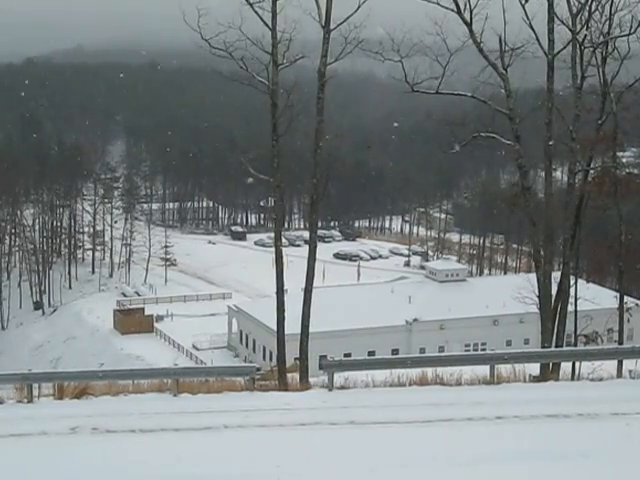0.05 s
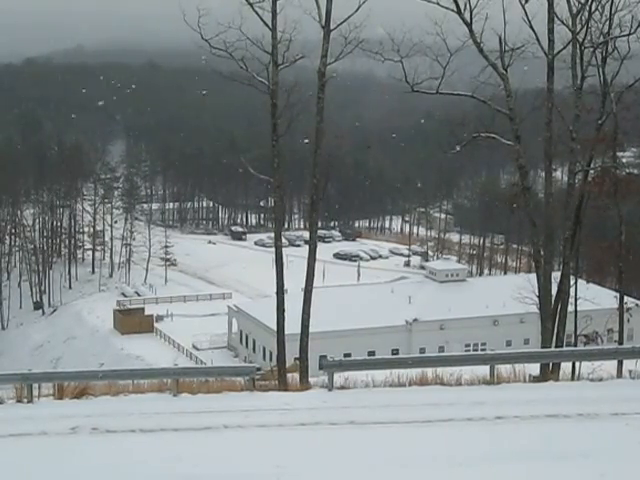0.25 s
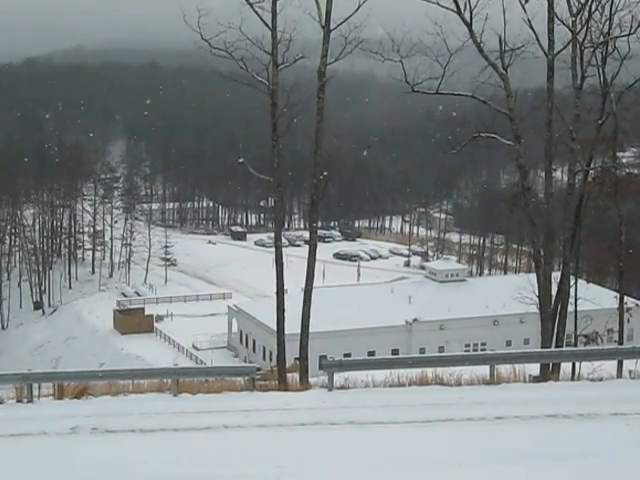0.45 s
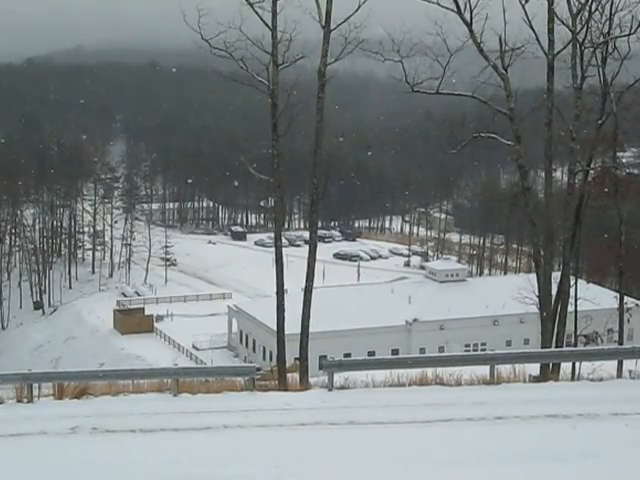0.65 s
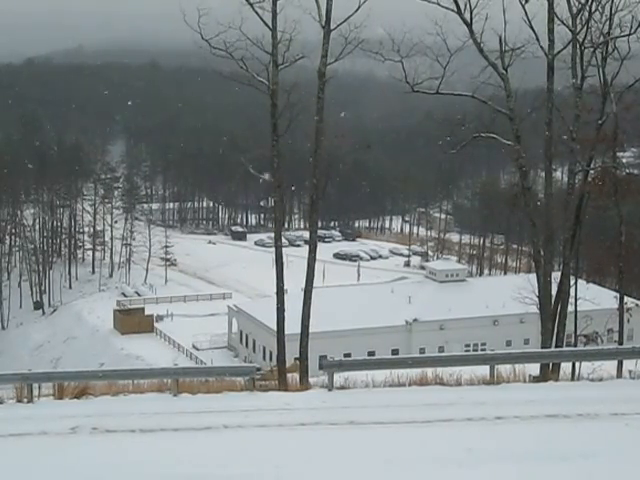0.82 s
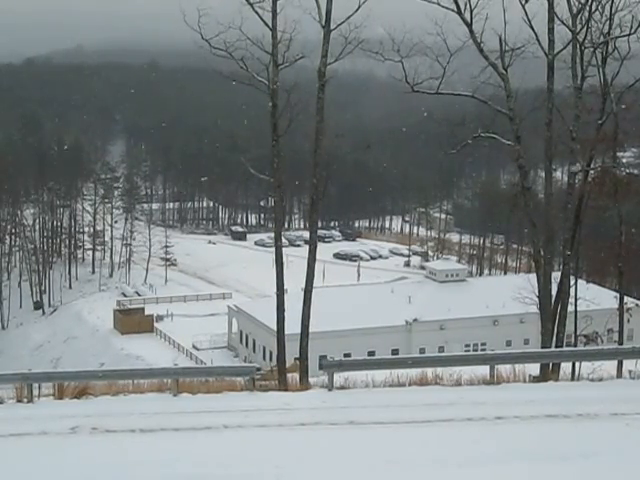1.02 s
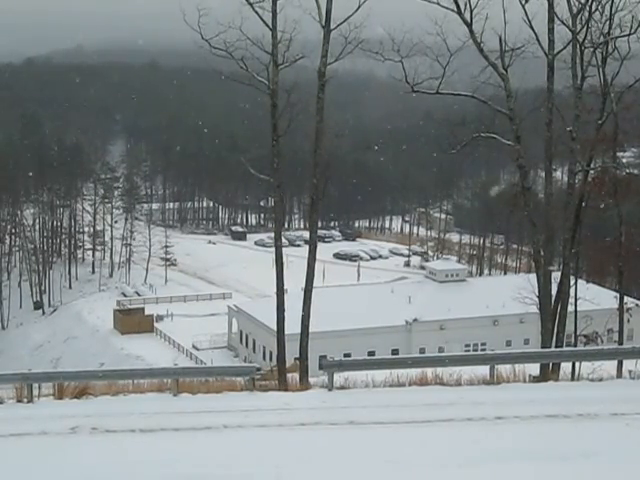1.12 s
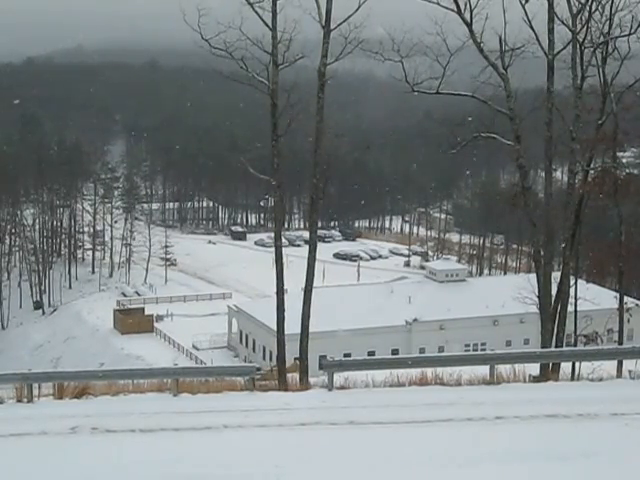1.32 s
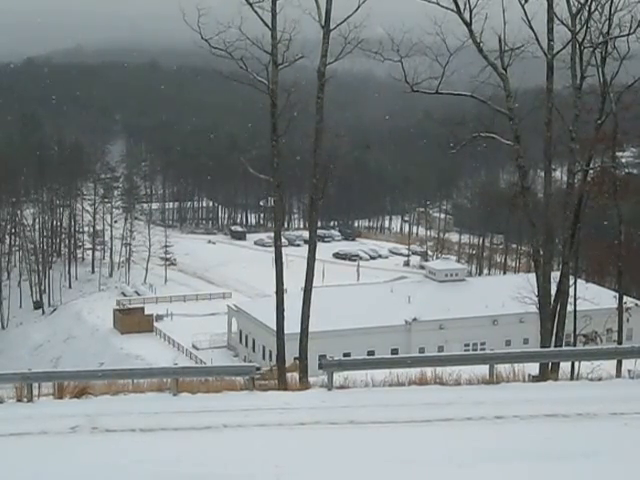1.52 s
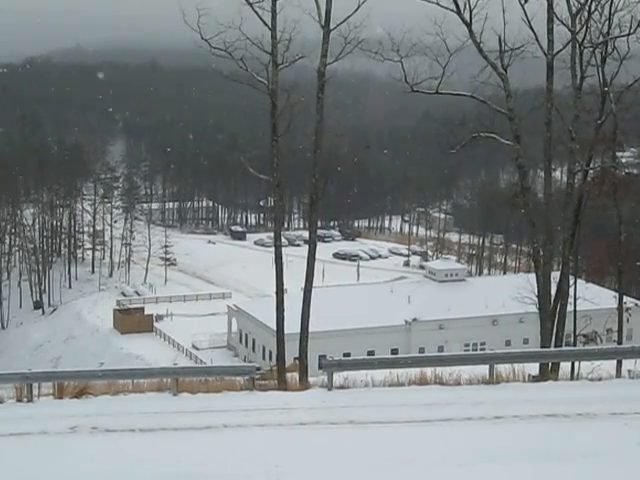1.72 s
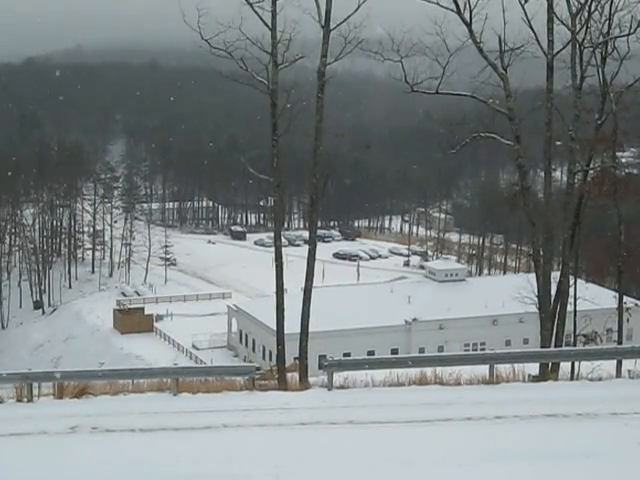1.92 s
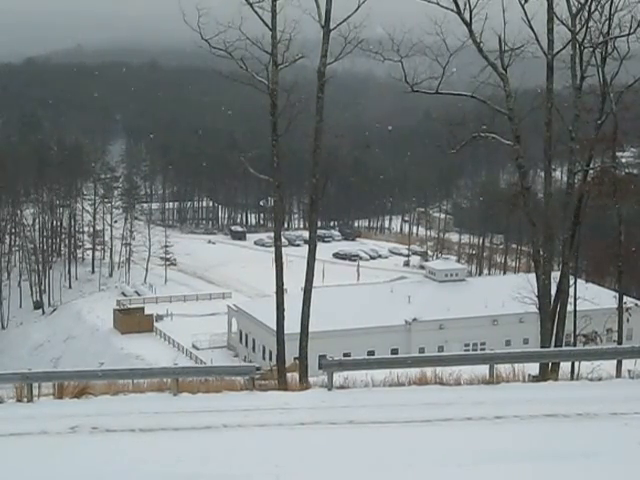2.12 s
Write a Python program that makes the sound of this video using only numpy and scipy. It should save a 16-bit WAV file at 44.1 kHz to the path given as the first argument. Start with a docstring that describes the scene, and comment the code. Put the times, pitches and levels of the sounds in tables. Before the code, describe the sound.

A small plastic button clicks twice close by, with soft finger brushing over quiet outdoor air.

```python
"""A still, snowy hillside on one microphone: a steady far-off rush and faint hiss throughout.
Close up, a small plastic control is pressed: it slides, scraping ever harder, and snaps home,
leaving a tiny spring ringing. A faint swish follows. About a second in, the control is let go
and scrapes and snaps again. Around that snap, and again after a pause, a finger brushes
softly over the casing."""
import sys
import numpy as np
from scipy import signal
from scipy.fft import rfft, irfft
from scipy.io import wavfile

SR = 44100
rng = np.random.default_rng(int(sys.argv[2]) if len(sys.argv) > 2 else 0)


def wav_record(signal):
    """Record a signal, one row per channel, as 16-bit PCM in the file named by sys.argv[1]."""
    frames = np.transpose(np.atleast_2d(signal))
    bounded = np.clip(frames, -1, 1)
    # unit amplitude maps onto the largest positive 16-bit level
    quanta = np.round(bounded * 32767).astype(np.int16)
    wavfile.write(sys.argv[1], SR, quanta)


N = 94815
TIME = np.arange(N) / SR
FREQS = np.fft.rfftfreq(N, 1 / SR)

# The far-off rush and hiss. Each row: frequency in Hz, level in dB per Hz.
AIR_SPECTRUM = [(20, -91.5), (50, -90), (100, -87), (200, -85.5), (400, -87), (700, -86), (1000, -87.5),
                (1300, -88), (2100, -89), (2800, -92.5), (4500, -95.5), (6500, -99.5), (9000, -101.5),
                (11000, -102.5), (13000, -103.7), (16000, -109)]
# The control, close up, pressed and then let go. Each row: time of the snap in seconds, its gain
# in dB, length of the slide before it in seconds, swell of that slide in dB.
CONTROL_MOVES = [(0.2245, 0, 0.091, 14), (1.1159, -1, 0.038, 12)]
# The scrape at the end of a slide. Each row: frequency in Hz, dB per Hz pressed, dB per Hz let go.
SCRAPE_SPECTRUM = [(300, -89.5, -88), (1400, -80, -73), (2080, -79, -72), (2820, -82.5, -87),
                   (3530, -82, -68.5), (4000, -71.5, -74), (4600, -83, -77.5), (5500, -82.5, -84),
                   (6600, -82, -82), (9200, -93.5, -87), (10700, -89, -86), (11900, -85, -90),
                   (13200, -92, -94), (16000, -94, -92)]
# The plastic shell's modes. Each row: frequency in Hz, seconds to fall 60 dB, level in dB pressed,
# level in dB let go (both before the snap's gain).
SHELL_MODES = [(510, 0.0044, -29, -23.5), (1310, 0.0087, -22.5, -22.5), (1578, 0.016, -32.5, -25.5),
               (2050, 0.013, -16, -17.5), (2420, 0.0042, -3.5, -9.5), (3260, 0.0033, 0.5, -10),
               (3990, 0.01, -12.5, -19.5), (4640, 0.0072, -13.5, -20), (5730, 0.0043, -15.5, -24.5),
               (6800, 0.0034, -20, -21.5), (9599, 0.0053, -29.5, -33), (11500, 0.0028, -28, -22.5),
               (12164, 0.0019, -46, -28)]
# The spring's pitches. Each entry: the frequency of one mode in Hz.
SPRING_PITCHES = [3560, 3688, 3930, 4824]
# The spring's ring at those pitches. Each row: level in dB, seconds to fall 60 dB.
SPRING_DECAYS = [(-44, .1), (-39, 0.1), (-41.5, 0.18), (-47.5, 0.23)]
# The faint swish. One row: start, attack, hold and release, all in seconds.
SWISH_TIMING = (0.25, 0.11, 0.13, 0.11)
# Finger strokes near the microphone. Each row: start, attack, hold and release in seconds,
# gain in dB, treble tilt in dB per octave.
FINGER_STROKES = [(1.027, 0.021, 0.0054, 0.01, -5, -12), (1.115, 0.052, 0.1, 0.055, -12, -3.5),
                  (1.517, .06, 0.0087, 0.043, -2.5, -3), (1.725, 0.032, .02, 0.039, -1, 2),
                  (1.791, 0.023, 0.092, .04, -6.5, -1)]
# The hiss of skin. Each row: frequency in Hz, dB per Hz before a stroke's gain and tilt.
SKIN_SPECTRUM = [(400, -104), (1500, -84.5), (2100, -87), (2700, -104), (7000, -104), (16000, -102)]
# The casing's resonances. Each row: centre in Hz, width in Hz, dB per Hz before gain and tilt.
CASING_RESONANCES = [(3540, 450, -85), (4170, 660, -81), (6550, 650, -92), (9700, 470, -89),
                     (11200, 550, -92.5), (12850, 650, -90.5)]


def from_db(db):
    """Decibels to gain."""
    return 10 ** (np.asarray(db) / 20)


def unit_power(x):
    """Scale to unit power."""
    return x / np.sqrt(np.mean(x ** 2) + 1e-20)


def curve(points):
    """Gain at every frequency from (Hz, dB) points."""
    hz, db = np.transpose(points)
    return from_db(np.interp(np.log(FREQS + 1), np.log(hz), db))


def colour(white, gain):
    """Give a white signal of unit power a spectrum in gain per root Hz."""
    return irfft(rfft(white) * gain, N) * np.sqrt(SR / 2)


def distant_air(waver_db=0.48, waver_below_hz=18):
    """A smooth rush from far across the hillside; its level barely wavers."""
    waver = unit_power(colour(rng.standard_normal(N), 1 / (1 + (FREQS / waver_below_hz) ** 2)))
    rush = colour(rng.standard_normal(N), curve(AIR_SPECTRUM))
    return from_db(waver_db * (waver - waver.mean())) * rush


def friction(spread_db, hiss_gain, slips_per_s=7000):
    """Tiny slips of uneven size on smooth hiss, at unit power."""
    sizes = from_db(spread_db * np.minimum(rng.exponential(1, N), 4))
    signs = rng.choice([-1, 1], N)
    slipping = rng.random(N) < slips_per_s / SR
    return unit_power(unit_power(sizes * signs * slipping) + hiss_gain * rng.standard_normal(N))


def control_slides():
    """Friction swells as the control travels and stops dead at the snap."""
    out = 0
    for move, (snap_s, _, slide_s, swell_db) in enumerate(CONTROL_MOVES):
        travel_left = (snap_s - TIME) / slide_s
        sliding = (travel_left > 0) & (travel_left < 1)
        pressure = from_db(-swell_db * np.clip(travel_left, 0, 1)) * sliding
        spectrum = curve([(hz, db[move]) for hz, *db in SCRAPE_SPECTRUM])
        out += pressure * colour(friction(spread_db=2, hiss_gain=0.66), spectrum)
    return out


def ring(start, hz, db, t60):
    """A struck mode: a sine that falls 60 dB in t60 seconds."""
    age = np.maximum(TIME - start, 0)
    return from_db(db - 60 * age / t60) * np.sin(2 * np.pi * hz * age)


def control_snaps(seat_delay_s=0.0031, seat_db=-28):
    """Each snap strikes the plastic shell, then the control seats with a softer tick."""
    out = 0
    for move, (snap_s, snap_db, *_) in enumerate(CONTROL_MOVES):
        for k, (hz, t60, *mode_db) in enumerate(SHELL_MODES):
            level_db = snap_db + mode_db[move]
            strike = ring(snap_s, hz, level_db, t60)
            seat = ring(snap_s + seat_delay_s, hz, level_db + seat_db, t60)
            out += (-1) ** k * (strike + seat)  # neighbouring modes start in opposite phase
    return out


def spring_ring():
    """The first snap sets a tiny spring ringing."""
    press_s = CONTROL_MOVES[0][0]
    return sum(ring(press_s, hz, db, t60) for hz, (db, t60) in zip(SPRING_PITCHES, SPRING_DECAYS))


def envelope(start, attack, hold, release):
    """A straight rise, a hold and a straight fall."""
    return np.interp(TIME, start + np.cumsum([0, attack, hold, release]), [0, 1, 1, 0])


def resonance(hz, width_hz, db):
    """Gain at every frequency of one resonance that peaks at db."""
    return from_db(db) * FREQS * width_hz / np.hypot(FREQS ** 2 - hz ** 2, FREQS * width_hz)


def swish():
    """A faint, narrow band of mid-range noise swells and fades."""
    band = resonance(hz=2000, width_hz=360, db=-84.5)
    return envelope(*SWISH_TIMING) * colour(rng.standard_normal(N), band)


def finger_brushes(pivot_hz=4200):
    """Skin rubs the casing and excites its broad resonances, each stroke with its own brightness."""
    casing_power = sum(resonance(*peak) ** 2 for peak in CASING_RESONANCES)
    spectrum = np.sqrt(curve(SKIN_SPECTRUM) ** 2 + casing_power)
    rubbing = friction(spread_db=4, hiss_gain=0.8)
    octaves = np.log2(np.hypot(FREQS / pivot_hz, 0.5))  # the tilt levels off in the bass
    out = 0
    for *timing, gain_db, tilt_db in FINGER_STROKES:
        out += envelope(*timing) * colour(rubbing, spectrum * from_db(gain_db + tilt_db * octaves))
    return out


def scene():
    """Handling close to the microphone over the quiet of the hillside, in mono."""
    return (distant_air() + control_slides() + control_snaps() + spring_ring()
            + swish() + finger_brushes())[None]


def record(dry, notch_hz=7920, notch_width_hz=1780, cutoff_hz=15900):
    """The recorder has a deep notch in the treble and a steep cut at the top."""
    notch = signal.iirnotch(notch_hz, notch_hz / notch_width_hz, fs=SR)
    top_cut = signal.ellip(10, 0.1, 70, cutoff_hz, fs=SR, output="sos")
    return signal.sosfilt(top_cut, signal.lfilter(*notch, dry))


dry = scene()
out = record(dry)
wav_record(out)
```